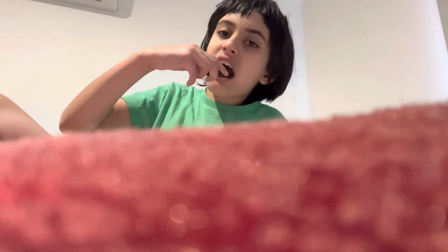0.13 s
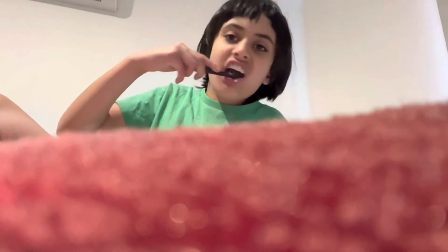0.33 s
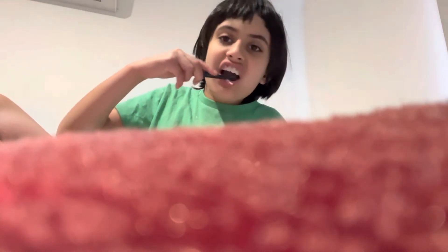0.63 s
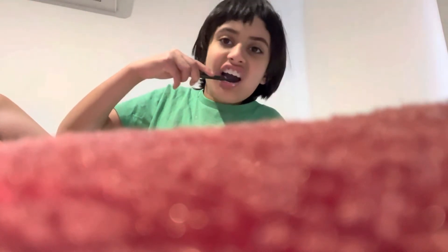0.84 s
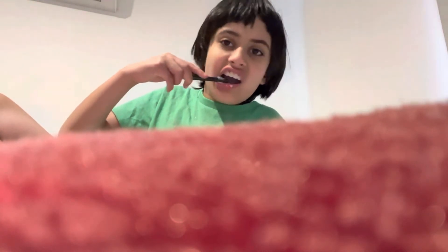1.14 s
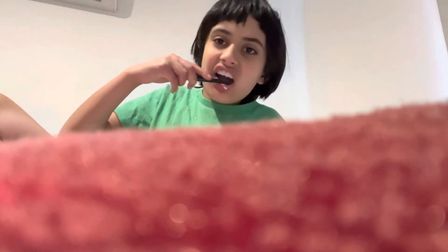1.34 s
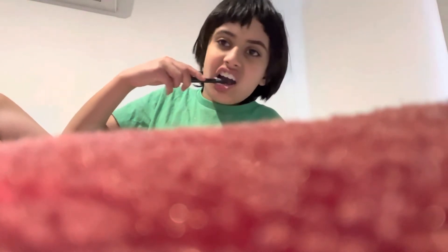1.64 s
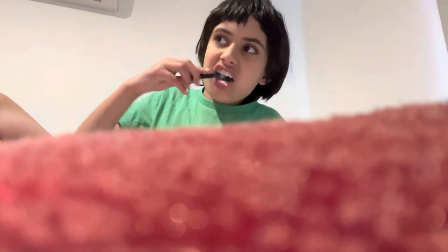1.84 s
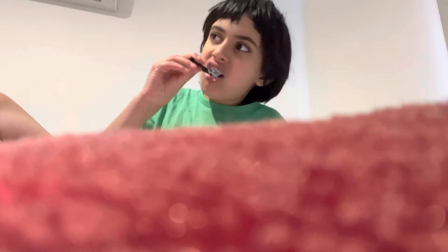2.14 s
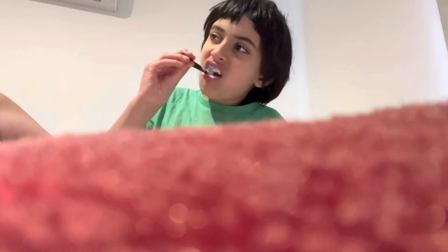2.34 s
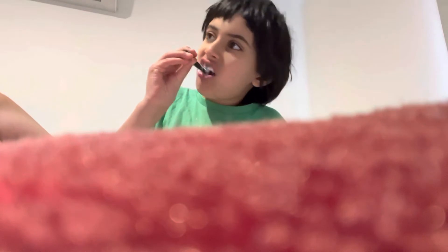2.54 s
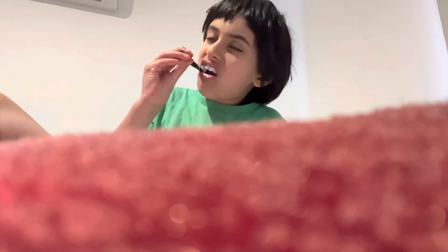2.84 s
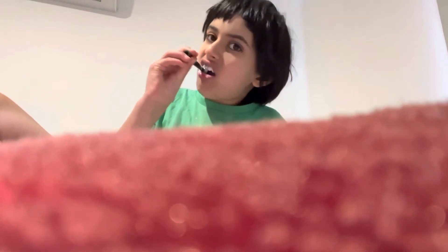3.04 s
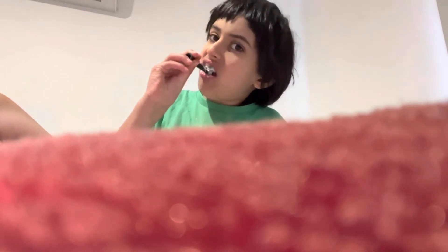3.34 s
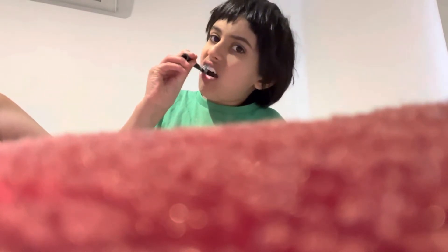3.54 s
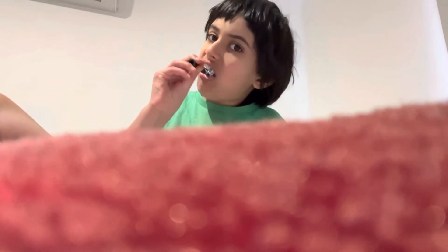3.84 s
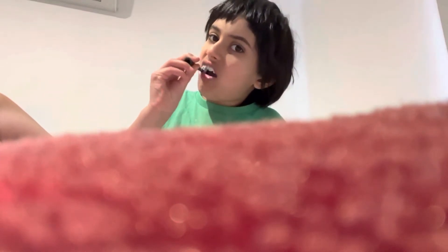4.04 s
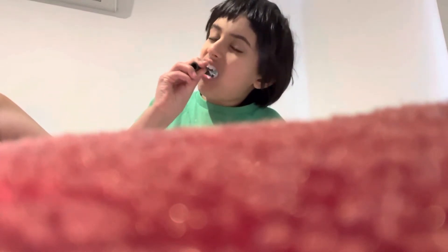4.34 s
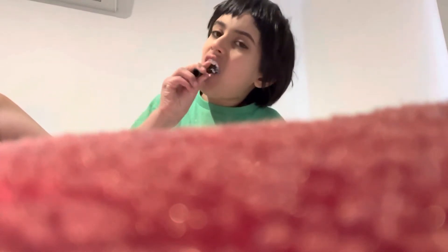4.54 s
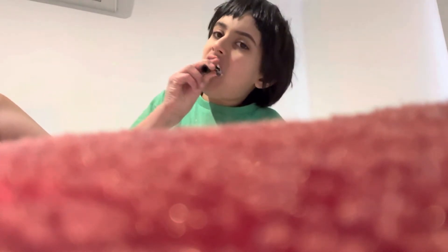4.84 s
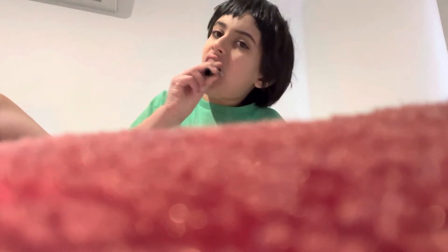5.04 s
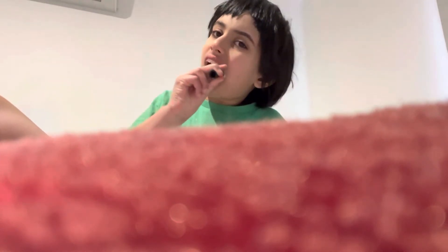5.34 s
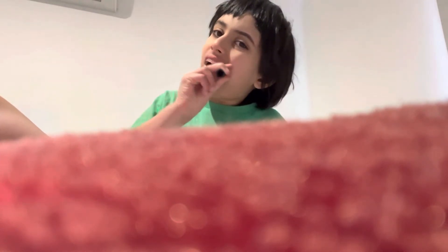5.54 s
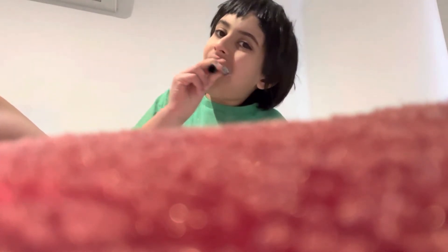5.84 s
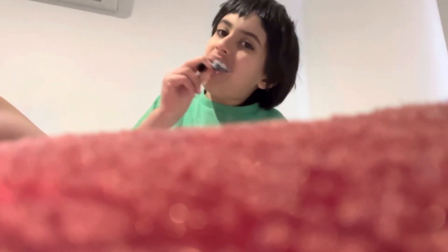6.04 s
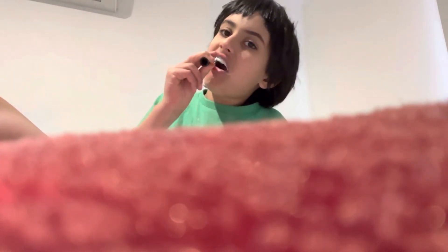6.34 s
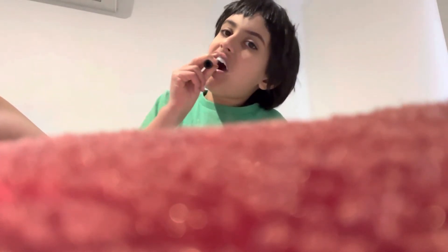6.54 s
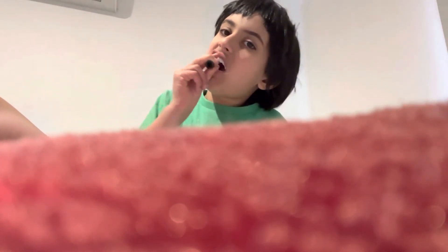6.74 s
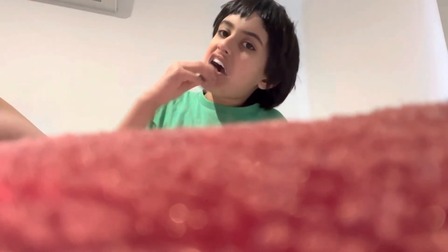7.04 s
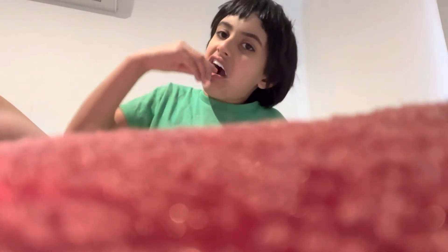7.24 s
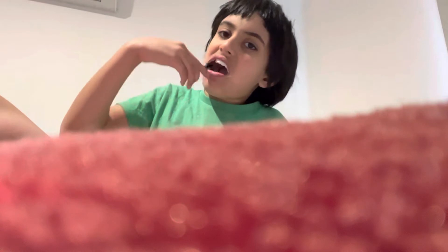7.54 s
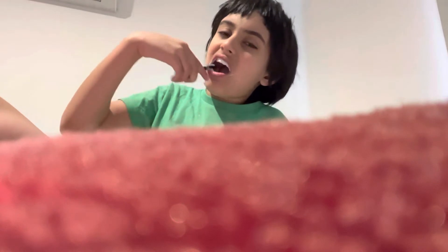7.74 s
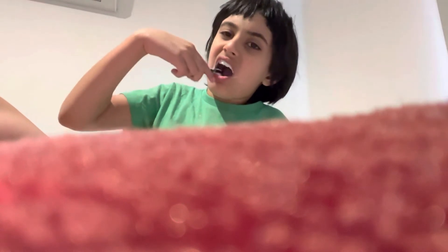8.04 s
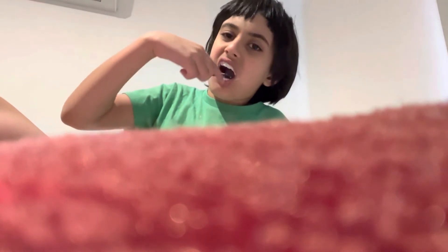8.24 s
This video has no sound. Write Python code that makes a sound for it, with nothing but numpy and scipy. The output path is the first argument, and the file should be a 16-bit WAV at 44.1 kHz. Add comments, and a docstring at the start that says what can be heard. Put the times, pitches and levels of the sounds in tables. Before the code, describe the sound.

A manual toothbrush scrubs teeth in quick, hissy strokes with small plastic ticks and wet smacks, while dull padded thumps bump in a faintly humming room.

```python
"""A child scrubs their teeth with a manual toothbrush in a small humming room, beyond a cushion by the microphone.
From the start: furniture knocks (sinking tones, frame ring, noise shudder) and strokes (bristle flicks through
hiss, mouth and cavity resonances), with head ticks (cracks and mouth ring) among them; soon wet smacks (pops,
pings, chirps). Then come cloth rustles (muffled flicks) and, past 2 s, one bright ting (decaying sines).
The mouth resonances step from side teeth to front teeth and, by way of other postures, back to the side."""
import sys
import numpy as np
from scipy import signal
from scipy.fft import rfft, irfft, next_fast_len
from scipy.io import wavfile
from scipy.ndimage import uniform_filter1d

SR = 44100
rng = np.random.default_rng(int(sys.argv[2]) if len(sys.argv) > 2 else 0)


def dump(signal):
    """Clip the signal to [-1, 1] and save it as 16-bit WAV at the path in sys.argv[1]."""
    limited = np.clip(np.atleast_2d(signal).T, -1, 1)
    pcm = np.round(limited * 32767).astype(np.int16)
    wavfile.write(sys.argv[1], SR, pcm)


N = 369999
TIME_S = np.arange(N) / SR

# room noise spectrum: (frequency [Hz], level [dB per Hz])
AIR_SPECTRUM = [(15, -73), (30, -17.5), (48, 0), (66, -11.5), (100, 0.5), (125, -4.5), (200, -9.5),
                (240, -12), (310, -13.5), (420, -22.5), (580, -30.5), (1000, -30.5), (1350, -42),
                (1620, -33.5), (2050, -45.5), (2800, -46), (7000, -50), (16000, -54.5)]
# steady hum lines: (frequency [Hz], level [dB rms])
HUM_LINES = [(48.4, -62), (96.9, -64)]
# left-right likeness of diffuse noise: (frequency [Hz], correlation, clipped to -1 to 1)
AIR_CORRELATION = [(30, 0.88), (130, 0.88), (280, 0.64), (500, -0.0098), (1000, -0.22), (3000, -0.2),
                   (7000, 0.25), (10000, -1.13), (13000, -0.85), (16000, -0.9)]
AIR_DB = -54

# padded furniture knocks: (time [s], strength [dB], pitch [Hz], frame ring [dB re tone],
# shudder [dB re tone], rise [s], t60 [s])
KNOCKS = [(0, -37.5, 261, -5, -2, .011, 0.21), (.536, -28, 122, -31, -18, 0.0093, 0.065),
          (0.592, -30.5, 136, -28, -19.5, 0.01, 0.073), (1.221, -39.5, 147, -17, -10.5, 0.0094, 0.11),
          (1.342, -38, 169, -28, -16, 0.008, 0.14), (1.872, -34, 121.4, -17, -16, 0.012, 0.17),
          (1.897, -30, 125, -23, -25, 0.0072, 0.062), (1.98, -36, 135, -11, -9, 0.01, 0.11),
          (2.639, -25.5, 184, -29, -20, 0.011, 0.091), (2.694, -30.5, 127, -29, -29, 0.015, 0.078),
          (2.784, -27.5, 164.3, -22, -17, .012, 0.12), (3.22, -15.5, 183, -29.5, -28, 0.0093, 0.079),
          (3.26, -29, 186, -18, -19, .016, 0.098), (3.286, -26.5, 181, -20, -9, .006, .09),
          (3.794, -29, 134.4, -15, -8, 0.0079, 0.19), (3.838, -34, 128.4, -16, -15, 0.0072, 0.38),
          (4.016, -46, 210, -14.5, -6.5, .011, 0.12), (4.19, -56, 290, -6, 3, .004, 0.084),
          (4.236, -46.5, 200, -14, -3, .006, 0.21), (4.277, -54.5, 265, -15, -3, 0.0066, 0.13),
          (5.331, -54, 160, -3.5, 0, 0.008, 0.15), (7.212, -24, 181, -16.5, -19, .0119, 0.14),
          (7.898, -35, 268, -3, -1, 0.0063, 0.15), (7.913, -29.5, 171, -19, -11, 0.006, 0.095),
          (7.978, -37.5, 146.7, -18, -0.5, 0.007, 0.28), (8.147, -39.5, 127, -10, 2, 0.0096, 0.085),
          (8.171, -16.5, 291.3, -8, -9, 0.0078, 0.093), (8.218, -18.5, 153.6, -22, -12.5, 0.0045, 0.1),
          (8.266, -19.5, 216, -10, -10, 0.00595, 0.069), (8.349, -23.5, 159.7, -18, -18, 0.014, 0.16)]
# low furniture modes: (frequency [Hz], level [dB], t60 [s])
BOOM_MODES = [(112.16, 5, 0.25), (146, -4.5, 0.39), (80.4, -5, 0.27), (48.6, -42, 0.037)]
# upper furniture modes: (frequency [Hz], level [dB], t60 [s])
FRAME_MODES = [(282.8, 0, .13), (353, -5.5, 0.13), (427, -6, 0.061), (623, -19, 0.091), (718, -31.5, 0.028)]
# shudder spectrum: (frequency [Hz], level [dB per Hz])
SHUDDER_SPECTRUM = [(60, -4.5), (200, 8.5), (255, 0), (290, 7.5), (320, 4), (350, 3.5), (390, -1),
                    (430, -0.5), (520, -5.5), (750, -11), (1100, -23), (1800, -30.5), (3000, -50.5),
                    (9000, -49)]
# boom level at ordinary strength, and its growth per dB of strength
ORDINARY_DB, BOOM_DB, BOOM_DB_PER_DB = -27.5, -40.5, 0.6
FRAME_RISE_S = 0.0041  # padding rounds the onset

# brush strokes: (middle [s], length [s], force [dB re firm stroke], cavity pitch [Hz], cavity level [dB])
STROKES = [(0.01, 0.038, 4.5, 1170, -65.5), (0.212, 0.17, -34, 1200, -75.5),
           (0.327, 0.13, 8.5, 1170, -61.5), (0.441, 0.16, 4.5, 1204, -66), (0.593, 0.16, 6, 1170, -66),
           (0.682, 0.15, 1.5, 1184, -73), (0.855, 0.14, 0, 1142, -69), (1.042, 0.18, 4, 1196, -65.5),
           (1.218, 0.16, -1.5, 1184, -73.5), (1.328, 0.083, 2, 1150, -67.5), (1.471, 0.17, 4, 1165, -66.5),
           (1.641, 0.12, 0.5, 1180, -73.5), (1.896, 0.061, -8, 960, -84), (2.252, 0.082, -11, 975, -102),
           (2.337, 0.12, -6.5, 975, -83), (2.467, 0.091, -12.5, 1070, -98), (2.532, 0.1, -6, 1020, -82),
           (2.744, 0.13, -2, 944, -79), (2.898, 0.08, -6, 980, -82), (3.18, 0.082, -3.5, 1000, -88),
           (3.25, 0.13, -6.5, 930, -77), (3.355, 0.15, -6.5, 1020, -77.5), (3.574, 0.23, -16.5, 990, -85),
           (3.7, 0.11, -5, 930, -84), (3.861, 0.17, -4.5, 1000, -74.5), (4.214, 0.052, -1, 926, -60),
           (4.637, 0.086, 3.5, 1064, -62), (4.686, 0.057, -12, 1060, -67), (4.767, 0.093, 1, 1045, -71.5),
           (4.852, 0.071, -3.5, 1020, -65.5), (4.964, 0.087, 1, 1090, -67), (5.066, 0.11, -1.5, 1190, -67),
           (5.154, 0.053, -19, 1130, -69), (5.253, 0.068, -8, 1120, -69.5), (5.311, 0.065, -6, 1190, -68),
           (5.455, 0.088, 9.5, 1183, -59), (5.583, 0.095, 9.5, 1190, -60.5), (5.678, 0.052, 7.5, 1200, -62),
           (5.773, 0.08, 4, 1210, -65), (5.802, 0.06, 7.5, 1103, -64), (5.881, 0.05, -3.5, 1040, -67),
           (5.989, 0.13, 0.5, 1074, -72), (6.062, 0.054, -25, 920, -82), (6.2, 0.16, -5, 950, -85),
           (6.485, 0.091, 0.5, 1094, -71.5), (6.59, 0.053, -3.5, 1030, -68.5), (6.673, 0.1, 1, 1126, -65.5),
           (6.786, 0.054, 0.5, 1115, -69), (6.872, 0.071, -2.5, 1066, -65),
           (6.942, 0.081, -3.5, 1086, -69.5), (7.036, 0.08, -9.5, 1096, -74),
           (7.335, 0.11, -5, 1094, -73.5), (7.446, 0.082, 0.5, 1254, -66), (7.571, 0.053, -29, 1180, -73.5),
           (7.689, 0.094, -11, 1164, -70), (7.795, 0.16, -17, 1160, -71), (7.886, 0.044, -8, 1160, -80),
           (7.985, 0.15, -6.5, 1150, -73.5), (8.154, 0.091, 3, 1100, -68), (8.224, 0.065, 0, 1180, -66),
           (8.327, 0.068, -5.5, 1133, -69)]
# mouth resonances, side teeth: (frequency [Hz], width [Hz], level [dB])
SIDE_TEETH = [(4250, 550, 15), (7260, 1000, 6.5), (7750, 2100, 0), (8240, 3900, 3.5)]
# front teeth: (frequency [Hz], width [Hz], level [dB])
FRONT_TEETH = [(4340, 2100, -4.5), (4340, 380, -6), (5820, 1900, 2), (7300, 1100, -6), (8640, 2900, 0.5),
               (3000, 13400, -9)]
# behind the front teeth: (frequency [Hz], width [Hz], level [dB])
BEHIND_FRONT = [(4090, 500, 5), (3700, 770, -4), (4830, 410, 3), (6260, 1800, 0), (8530, 2900, -2),
                (2960, 2800, -7.5)]
# lips closing: (frequency [Hz], width [Hz], level [dB])
LIPS_CLOSING = [(3650, 460, -1), (4180, 710, 4), (5550, 2400, 2), (6800, 1400, 0), (8650, 2000, -4)]
# back teeth: (frequency [Hz], width [Hz], level [dB])
BACK_TEETH = [(4090, 590, 6.5), (3550, 840, -6.5), (5340, 320, 4), (6380, 860, 0), (7050, 710, -13),
              (8100, 3900, -3.5)]
# side teeth, mouth wide: (frequency [Hz], width [Hz], level [dB])
SIDE_WIDE = [(4405, 370, 6.5), (7660, 770, 4.5), (8400, 1800, 1.5)]
# lips wide: (frequency [Hz], width [Hz], level [dB])
LIPS_WIDE = [(4470, 990, 8.5), (3800, 790, 0), (7750, 2700, -6.5)]
# brush postures, levels for a firm stroke: (start [s], mouth resonances, hiss [dB], mouth [dB])
POSTURES = [(0, SIDE_TEETH, -86, -71), (0.76, SIDE_WIDE, -98, -68), (1.8, FRONT_TEETH, -76, -61),
            (4.6, BEHIND_FRONT, -92, -70.5), (4.92, BEHIND_FRONT, -85, -70.5),
            (5.2, LIPS_CLOSING, -92, -75), (5.85, BACK_TEETH, -66.5, -71), (7.25, LIPS_WIDE, -80, -66),
            (7.39, LIPS_CLOSING, -64, -71.5), (7.52, BEHIND_FRONT, -62, -67.5),
            (8.1, FRONT_TEETH, -69, -66), (8.28, SIDE_TEETH, -71, -63)]
# direct bristle spectrum: (frequency [Hz], level [dB per Hz])
BRISTLE_SPECTRUM = [(100, -26.5), (700, 2), (1700, -5), (2800, -8.5), (5500, -5), (8000, 3), (9600, 0.5),
                    (11400, -5), (13200, 7), (14800, -6.5), (15800, 2.5)]
# soft hiss also between strokes, silent outside these times: (time [s], level [dB])
HISS_BED = [(1.6, -89), (1.95, -71.5), (2.2, -79), (2.65, -85), (3.1, -84), (3.55, -78.5), (3.97, -73.5),
            (4.2, -67), (4.45, -67.5), (5.05, -71.5), (5.4, -100)]
HISS_DB_PER_FORCE_DB = 2.1  # harder strokes are brighter
MOUTH_SCATTER = 0.033  # relative shift of mouth resonances, standard deviation per stroke
CAVITY_WIDTH_HZ, CAVITY_CUT_RATIO = 123, .86  # high-pass corner as a share of the pitch
# upper cavity resonance, stronger in short strokes; UPPER_DB holds at UPPER_STROKE_S
UPPER_RATIO, UPPER_WIDTH_HZ, UPPER_DB, UPPER_STROKE_S = 1.047, 560, -8, 0.062
# bristle drag at the turn: level re stroke, delay in stroke lengths, pitch ratio, pitch fall
DRAG_DB, DRAG_DELAY, DRAG_RATIO, DRAG_SINK = -12.5, 0.75, 0.93, .06

# clear head-on-tooth ticks: (time [s], peak of ring [dB])
TICKS = [(0.3078, -39), (0.3157, -48), (0.624, -49), (1.064, -46.5), (1.2, -49), (1.423, -53), (1.46, -47),
         (1.48, -46), (1.5098, -42), (1.632, -48), (3.688, -48), (4.1225, -45), (4.148, -45), (4.2, -46),
         (5.421, -60), (5.474, -54.5), (5.488, -61), (5.549, -51.5), (5.654, -54), (6.469, -50.5),
         (6.6412, -50), (6.86, -47.5), (7.236, -58.5), (7.319, -53), (7.69, -52.5), (7.749, -62.5),
         (8.1252, -40), (8.31, -54)]
# plastic head resonance: (frequency [Hz], width [Hz], level [dB])
HEAD_MODE = (7800, 670, -6.5)
# dry contact crack: (frequency [Hz], level [dB per Hz])
CRACK_SPECTRUM = [(500, -26.5), (2500, -6.5), (4500, -1), (7500, -13.5), (12000, 1.5), (16000, -4.5)]
CRACK_DB = 2.5  # re ring
# chance ticks: probability at each of four teeth, lowest peak in a firm stroke, range
LIGHT_CHANCE, LIGHT_DB, LIGHT_RANGE_DB = 0.29, -63, 6.5

# wet smacks: (time [s], pop peak [dB], lip ping peak [dB])
SMACKS = [(0.2443, -43, -50.5), (0.3082, -32, -31), (0.3208, -38.5, -47), (0.528, -42.5, -52),
          (4.185, -40, -61)]
# pop spectrum: (frequency [Hz], level [dB per Hz])
POP_SPECTRUM = [(200, 4), (500, -8), (750, -1.5), (1000, 2.5), (1300, -7), (1600, -9), (2200, -6),
                (2450, -18), (3100, -14.5), (4000, -14), (5100, -7.5), (6000, -15), (7200, -13),
                (12000, -17), (16000, -40)]
# lip ping resonances: (frequency [Hz], width [Hz], level [dB])
PING_MODES = [(2920, 340, -0.5), (1500, 890, -13), (4700, 770, -21), (7200, 1100, -23), (10100, 2200, -12)]
# chirp level re ping, delay, first and last pitch, length
CHIRP_DB, CHIRP_DELAY_S, CHIRP_FROM_HZ, CHIRP_TO_HZ, CHIRP_S = -13, .002, 3800, 750, .0095
# cavity ring after a smack; level re pop
SMACK_RING_HZ, SMACK_RING_WIDTH_HZ, SMACK_RING_DB, SMACK_RING_S = 1177, 280, -19.5, 0.027

# cloth shifts: (middle [s], length [s], level [dB], low-pass corner [Hz])
RUSTLES = [(1.241, 0.11, -76, 8000), (1.932, 0.21, -80, 8000), (3.3, 0.21, -78.5, 2500),
           (3.832, 0.071, -70.5, 1300), (4.23, 0.21, -76, 8000), (4.422, 0.23, -78, 6050),
           (4.887, .14, -75, 2000), (7.122, 0.23, -76, 2430), (7.221, 0.19, -74, 2540),
           (8.213, 0.22, -65.5, 2150), (8.218, 0.014, -55.5, 2250), (8.314, 0.12, -71.5, 2220)]
# cloth spectrum: (frequency [Hz], level [dB per Hz])
CLOTH_SPECTRUM = [(80, -21), (400, 2), (900, -4), (1700, -3), (2600, -6), (6000, -5.5), (9000, -31),
                  (16000, -41)]

# ting modes: (frequency [Hz], level [dB], t60 [s])
TING_MODES = [(7160, -67, 0.088), (11200, -53, 0.072), (11900, -51, 0.06)]
TING_START_S = 2.188

# microphone pair, direct sound: (frequency [Hz], left lead [rad])
PORT_PHASE = [(100, 0), (1200, 0), (3200, -.2), (4200, -1.3), (5200, -2.7), (7000, -3.2), (8000, -4),
              (9600, -3.2), (12500, -3.1), (14500, -2.4), (16000, -.7)]
# microphone pair, direct sound: (frequency [Hz], left minus right [dB])
PORT_BALANCE = [(200, 2), (600, -22.5), (1100, -5.5), (2000, -0.5), (4000, 0.5), (4600, 4), (5500, -4),
                (6500, 9.5), (7500, 6.5), (8500, 5), (9500, 0.5)]
# reverberation colour, added to each source's wet level: (frequency [Hz], level [dB])
ROOM_SHARE = [(100, -7.5), (300, 5.5), (600, 2), (2000, -4.5), (4000, 0), (7500, -0.5), (10000, -18.5),
              (13000, -33.5), (16000, -2)]
# reverberation decay: (frequency [Hz], t60 [s])
ROOM_T60 = [(100, 0.31), (500, 0.38), (2000, 0.31), (8000, 0.15), (16000, 0.33)]
EDGE_HZ = 15850


def amp(db):
    """Decibels to gain."""
    return 10 ** (np.asarray(db) / 20)


def unit(x):
    """Scales to rms 1."""
    return x / np.sqrt(np.mean(x ** 2) + 1e-20)


def read(points, hz):
    """Interpolates a table on a log-frequency axis."""
    table_hz, value = np.transpose(points)
    return np.interp(np.log(hz + 1), np.log(table_hz + 1), value)


def add(mix, start_s, sound):
    """Mixes a sound in at start_s, or at 0 if earlier."""
    part = mix[max(round(start_s * SR), 0):][:len(sound)]
    part += sound[:len(part)]


def shaped(x, response):
    """Filters by a function giving gain against frequency."""
    size = next_fast_len(x.shape[-1] + 2048)
    hz = np.arange(size // 2 + 1) * SR / size
    return irfft(rfft(x, size) * response(hz), size)[..., :x.shape[-1]]


def coloured(x, spectrum):
    """Imposes a spectrum on x and scales to rms 1."""
    return unit(shaped(x, lambda hz: amp(read(spectrum, hz))))


def resonate(x, hz, width_hz):
    """Band-pass resonance with unit peak gain."""
    hz = min(hz, .48 * SR)
    return signal.lfilter(*signal.iirpeak(hz, hz / width_hz, SR), x)


def ring(x, modes):
    """Parallel resonances, each two cascaded band-passes 1% wider than listed."""
    out = 0
    for hz, width_hz, db in modes:
        once = resonate(x, hz, width_hz * 1.01)
        out = out + amp(db) * resonate(once, hz, width_hz * 1.01)
    return out


def decaying_sines(modes, t):
    """Sum of freely decaying modes."""
    return sum(amp(db - 60 * t / t60_s) * np.sin(2 * np.pi * hz * t) for hz, db, t60_s in modes)


def glide(x, hz, width_hz):
    """Resonance following the curve hz: shift down to zero, smooth by a double pole, shift back."""
    turn = np.exp(2j * np.pi * np.cumsum(hz) / SR)
    r = np.exp(-np.pi * width_hz / SR)
    return (turn * signal.lfilter([(1 - r) ** 2], [1, -2 * r, r * r], x / turn)).real


def cut(x, hz, kind):
    """Steep high-pass or low-pass."""
    return signal.sosfilt(signal.butter(4, min(hz, .45 * SR), kind, fs=SR, output="sos"), x)


def arch(middle_s, length_s):
    """Sample indices of one movement, and its half-sine speed."""
    first = max(int((middle_s - length_s / 2) * SR), 0)
    at = np.arange(first, min(int((middle_s + length_s / 2) * SR), N))
    return at, np.maximum(np.cos(np.pi * (at / SR - middle_s) / length_s), 0)


def flicks(per_s, spread_db, smooth, clump_db):
    """Stick-slip releases of uneven size, in clumps, over smooth friction noise."""
    chance = rng.random(N)
    size = np.minimum(rng.exponential(1, N), 4)
    sign, hiss, slow = rng.standard_normal((3, N))
    clumps = unit(uniform_filter1d(uniform_filter1d(slow, size=260), size=160))
    grains = unit((chance < per_s / SR) * np.sign(sign) * amp(spread_db * size))
    return unit((grains + smooth * hiss) * amp(clump_db * clumps))


def snap(decay_s):
    """Very short contact: one impulse plus decaying noise."""
    t = np.arange(2000) / SR
    return (t == 0) + 1.2 * rng.standard_normal(len(t)) * np.exp(-t / decay_s)


def posture(s):
    """Mouth resonances, hiss dB and mouth dB held at time s."""
    return POSTURES[sum(row[0] <= s for row in POSTURES[1:])][1:]


def diffuse(spectrum):
    """Noise from all around, its left-right correlation set at each frequency."""
    mid, side = rng.standard_normal((2, N))
    mid = shaped(mid, lambda hz: np.sqrt(1 + np.clip(read(AIR_CORRELATION, hz), -1, 1)))
    side = shaped(side, lambda hz: np.sqrt(1 - np.clip(read(AIR_CORRELATION, hz), -1, 1)))
    return coloured(np.array([mid + side, mid - side]), spectrum)


def in_room(x, wet_db, early_db):
    """Direct sound at two ports, plus near reflections and a decaying tail."""
    t = TIME_S[:SR // 2]
    signs = rng.choice([-1., 1.], (2, len(t)))
    taps = signs * (rng.random((2, len(t))) < .08) * (t > .003)
    taps *= 1 + amp(early_db) * np.exp(-t / 0.0043)
    band_hz, frame_s, bands = signal.stft(taps, SR, nperseg=256)
    decay = amp(-60 * frame_s / read(ROOM_T60, band_hz)[:, None])
    tail = signal.istft(bands * decay, SR, nperseg=256)[1]
    wet = signal.fftconvolve(x[None], tail / np.linalg.norm(tail[0]), axes=1)[:, :N]
    ear = np.array([[.5], [-.5]])  # half the difference to each side
    direct = shaped(x, lambda hz: amp(ear * read(PORT_BALANCE, hz)) * np.exp(1j * ear * read(PORT_PHASE, hz)))
    return direct + shaped(wet, lambda hz: amp(wet_db + read(ROOM_SHARE, hz)))


def room_tone(waver_cycles=0.48):
    """Low rumble, and an appliance hum whose phase wanders slowly."""
    slow = shaped(rng.standard_normal(N), lambda hz: np.exp(-(hz / 2) ** 2))
    drift = waver_cycles * unit(slow)
    hum = 0
    for hz, db in HUM_LINES:
        turns = hz * TIME_S + drift + rng.random()
        hum = hum + amp(db) * np.sqrt(2) * np.sin(2 * np.pi * turns)
    return amp(AIR_DB) * diffuse(AIR_SPECTRUM) + hum


def knocks(sag=0.32, sag_s=0.026, shudder_t60_s=0.25):
    """Padded blows: a tone sinking as pressure eases, low boom, frame ring and noise shudder."""
    body, shudder_power = np.zeros((2, N))
    t = TIME_S[:SR // 2]
    boom = decaying_sines(BOOM_MODES, t)
    frame = decaying_sines(FRAME_MODES, t) * (1 - np.exp(-(t / FRAME_RISE_S) ** 2))
    for start_s, db, hz, frame_db, shudder_db, rise_s, t60_s in KNOCKS:
        onset = 1 - np.exp(-(t / rise_s) ** 2)
        turns = np.cumsum(hz * (1 - sag / 2 + sag * np.exp(-t / sag_s))) / SR
        tone = amp(db - 60 * t / t60_s) * np.sin(2 * np.pi * turns)
        boom_db = BOOM_DB + BOOM_DB_PER_DB * (db - ORDINARY_DB)
        add(body, start_s, onset * (tone + amp(boom_db) * boom))
        add(body, start_s + rise_s / 2, amp(db + frame_db) * frame)
        add(shudder_power, start_s, (onset * amp(db + shudder_db - 60 * t / shudder_t60_s)) ** 2)
    return body, np.sqrt(shudder_power) * diffuse(SHUDDER_SPECTRUM)


def brush(grip=1.0, cavity_grip=0.56, squeeze=0.042, sink=0.038, catch=0.21, catch_s=0.006):
    """Bristle flicks swell with stroke speed: direct, in the gaps round the teeth and in the mouth cavity."""
    drive = flicks(per_s=1500, spread_db=2.5, smooth=0.9, clump_db=2.5)
    hiss = coloured(drive, BRISTLE_SPECTRUM)
    out = hiss * amp(np.interp(TIME_S, *np.transpose(HISS_BED), left=-np.inf, right=-np.inf))
    jaws = rng.standard_normal(len(STROKES))
    for (s, length_s, force_db, cavity_hz, cavity_db), jaw in zip(STROKES, jaws):
        modes, hiss_db, mouth_db = posture(s)
        at, speed = arch(s, length_s)
        held_modes = [(hz * (1 + MOUTH_SCATTER * jaw), width_hz, db) for hz, width_hz, db in modes]
        mouth = unit(ring(drive[at], held_modes))
        direct = amp(hiss_db + HISS_DB_PER_FORCE_DB * force_db) * hiss[at]
        out[at] += speed ** grip * (direct + amp(mouth_db + force_db) * mouth)
        # pitch rises as the brush head fills the cavity, sinks as it leaves
        pitch_hz = cavity_hz * (1 + squeeze * (speed - speed.mean()) - sink * (at / SR - s) / length_s)
        upper_gain = amp(UPPER_DB) * (UPPER_STROKE_S / length_s) * speed
        upper = upper_gain * glide(drive[at], pitch_hz * UPPER_RATIO, UPPER_WIDTH_HZ)
        cavity = glide(drive[at], pitch_hz, CAVITY_WIDTH_HZ) + upper
        cavity = unit(cut(cavity, CAVITY_CUT_RATIO * cavity_hz, "high"))
        # the cavity jumps as the bristles break loose
        loose = catch * np.exp(-(at - at[0]) / SR / catch_s)
        out[at] += (speed ** cavity_grip + loose) * amp(cavity_db) * cavity
        # bristles drag on as the brush turns round
        turn_s = s + DRAG_DELAY * length_s
        at, speed = arch(turn_s, length_s)
        pitch_hz = cavity_hz * (DRAG_RATIO - DRAG_SINK * (at / SR - turn_s) / length_s)
        drag = unit(glide(drive[at], pitch_hz, CAVITY_WIDTH_HZ))
        out[at] += speed * amp(cavity_db + DRAG_DB) * drag
    return out


def ticks():
    """Hard plastic meets a tooth: a dry crack, and a short ring of the mouth in its present posture."""
    out, click, contacts = np.zeros(N), np.zeros(256), list(TICKS)
    click[32] = 1  # leaves room for ringing ahead of the peak
    crack = coloured(click, CRACK_SPECTRUM)
    for s, length_s, force_db, *_ in STROKES:
        for place, chance, size in rng.random((4, 3)):
            if chance < LIGHT_CHANCE:
                light_db = LIGHT_DB + force_db + LIGHT_RANGE_DB * size
                contacts.append((s + length_s * (place - .5), light_db))
    snaps = [snap(decay_s=0.0014) for _ in range(len(TICKS))]
    for k, (s, db) in enumerate(contacts):
        tick = ring(snaps[k % len(snaps)], [*posture(s)[0], HEAD_MODE])
        add(out, s, amp(db) * tick / abs(tick).max())
        add(out, s, amp(db + CRACK_DB) * crack / abs(crack).max())
    return out


def smacks():
    """A saliva film breaks: the open mouth pops, the lip gap pings, then chirps downwards as it widens."""
    pops, pings = np.zeros((2, N))
    click = np.zeros(1024)
    click[64] = 1  # leaves room for ringing ahead of the peak
    pop = coloured(click, POP_SPECTRUM)
    opening = np.arange(0, 1, 1 / (CHIRP_S * SR))
    chirp_hz = CHIRP_FROM_HZ * (CHIRP_TO_HZ / CHIRP_FROM_HZ) ** opening
    chirp = np.sqrt(abs(np.sin(np.pi * opening))) * np.sin(2 * np.pi * np.cumsum(chirp_hz) / SR)
    for s, db, ping_db in SMACKS:
        ping = ring(snap(decay_s=.0001), PING_MODES)
        add(pops, s - .001, amp(db) * pop / abs(pop).max())
        add(pings, s, amp(ping_db) * ping / abs(ping).max())
        add(pings, s + CHIRP_DELAY_S, amp(ping_db + CHIRP_DB) * chirp)
    return pops, pings


def cavity_ring():
    """The open mouth rings on while the saliva film tears: resonant noise that swells and decays."""
    out, t = np.zeros(N), TIME_S[:SR // 4]
    noise = rng.standard_normal(len(t))
    tearing = unit(ring(noise, [(SMACK_RING_HZ, SMACK_RING_WIDTH_HZ, 0)]))
    swell = t / SMACK_RING_S * np.exp(-t / SMACK_RING_S)
    for s, db, _ in SMACKS:
        add(out, s, amp(db + SMACK_RING_DB) * tearing * swell)
    return out


def rustles():
    """Cloth fibres slip over each other; pressed cloth is muffled."""
    out = np.zeros(N)
    fibres = coloured(flicks(per_s=1600, spread_db=5.5, smooth=0.58, clump_db=2.5), CLOTH_SPECTRUM)
    for s, length_s, db, top_hz in RUSTLES:
        at, speed = arch(s, length_s)
        out[at] += amp(db) * speed ** 2 * unit(cut(fibres[at], top_hz, "low"))
    return out


def ting():
    """High decaying modes of something small and hard."""
    out = np.zeros(N)
    add(out, TING_START_S, decaying_sines(TING_MODES, TIME_S[:SR // 2]))
    return out


def scene():
    """All sources in the room."""
    body, shudder = knocks()
    pops, pings = smacks()
    mouth = in_room(brush() + cavity_ring(), wet_db=-3.0, early_db=11.5)
    mouth = mouth + in_room(pops, wet_db=11.5, early_db=-27)
    clicks = in_room(ticks() + ting() + pings, wet_db=-2.5, early_db=1.5)
    thud = in_room(body, wet_db=-5.5, early_db=0)
    # slight cross-mix: the furniture shakes both ports
    thud = .85 * thud + .15 * thud[::-1]
    furniture = thud + shudder + in_room(rustles(), wet_db=9, early_db=10)
    return room_tone() + furniture + mouth + clicks


def record(dry):
    """Linear-phase low-pass: the upper band limit."""
    band_limit = signal.firwin(511, EDGE_HZ, window=("kaiser", 9), fs=SR)
    return signal.oaconvolve(dry, band_limit[None], "same")


dry = scene()
out = record(dry)
dump(out)
```